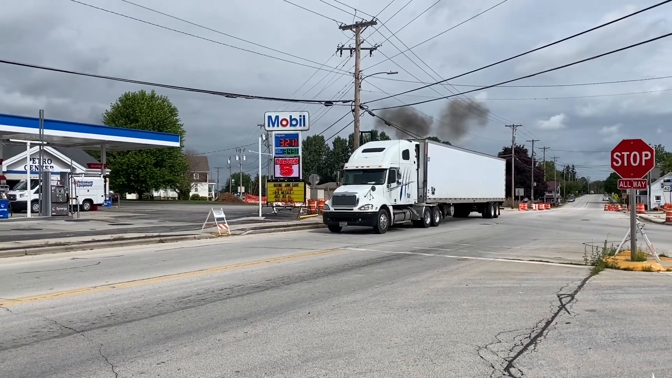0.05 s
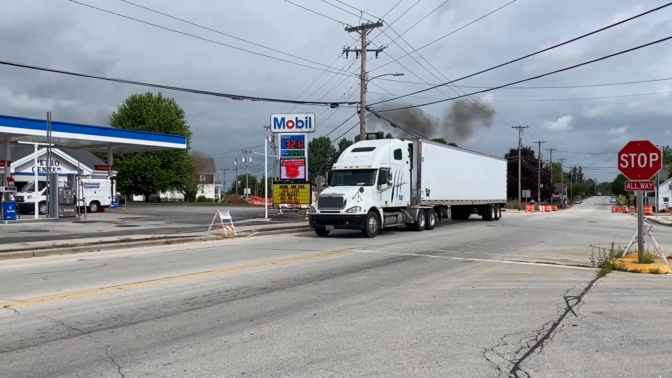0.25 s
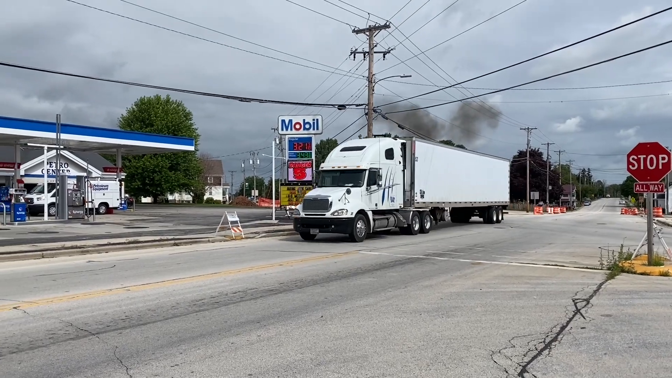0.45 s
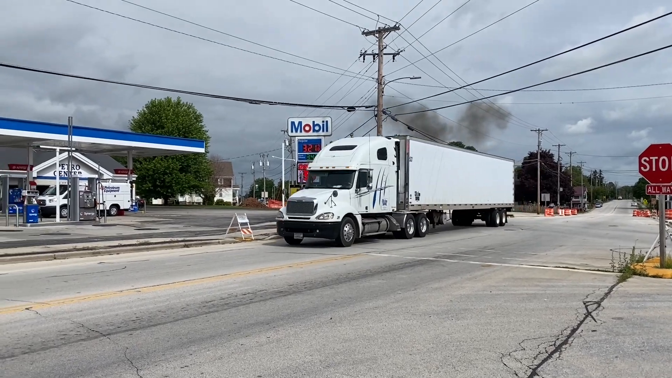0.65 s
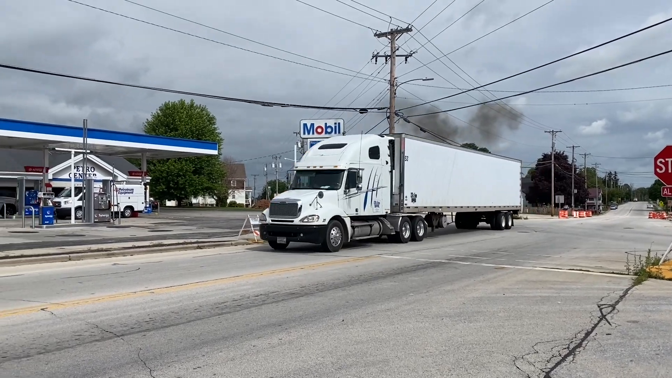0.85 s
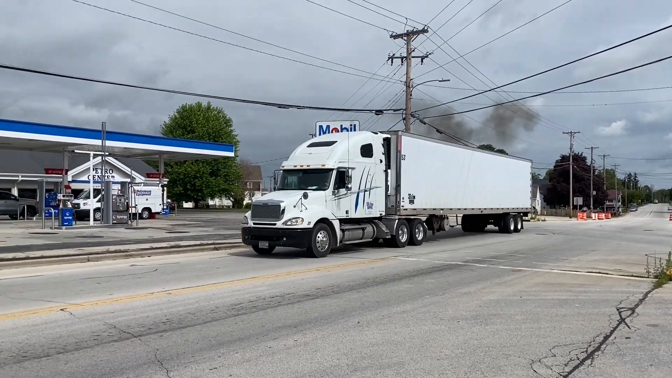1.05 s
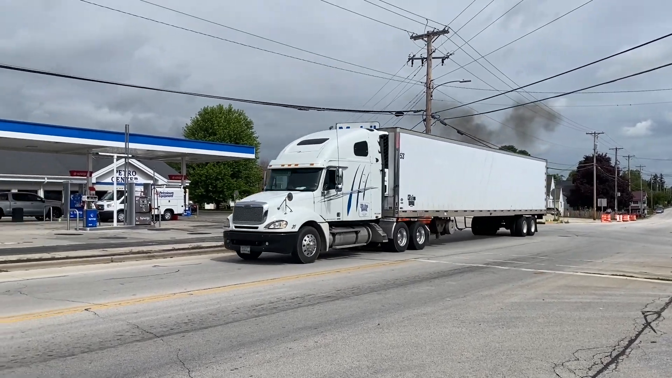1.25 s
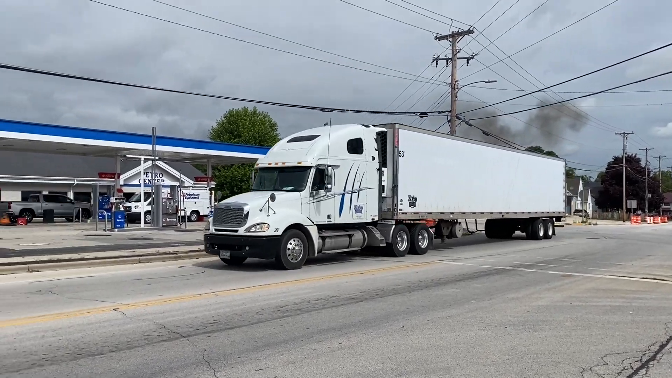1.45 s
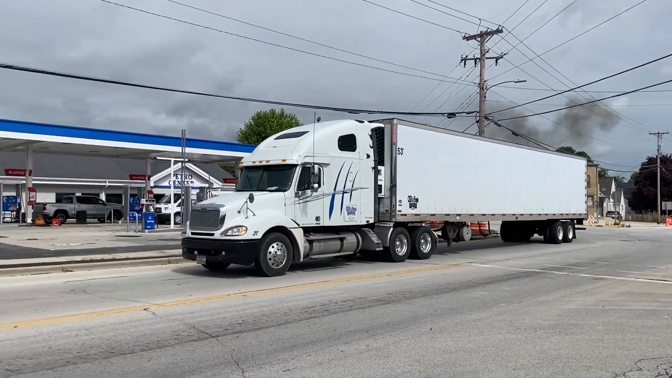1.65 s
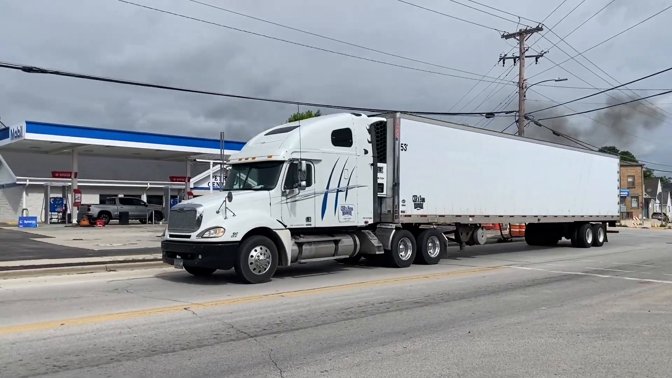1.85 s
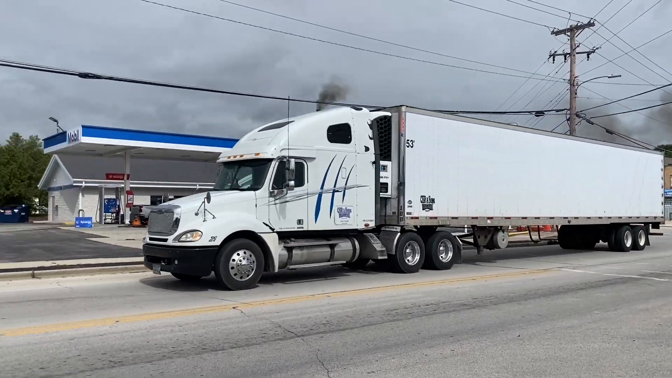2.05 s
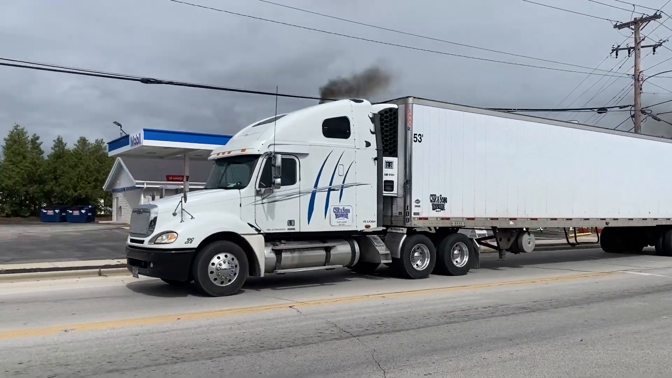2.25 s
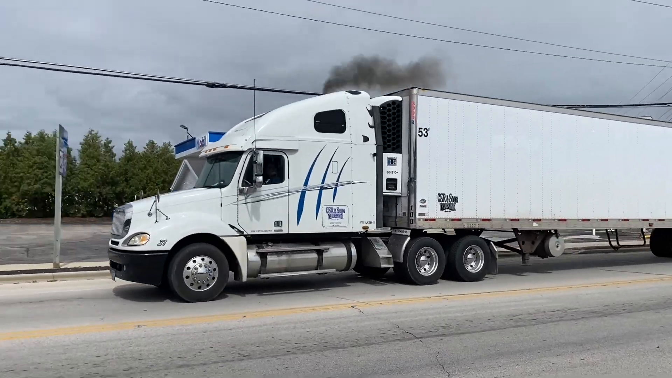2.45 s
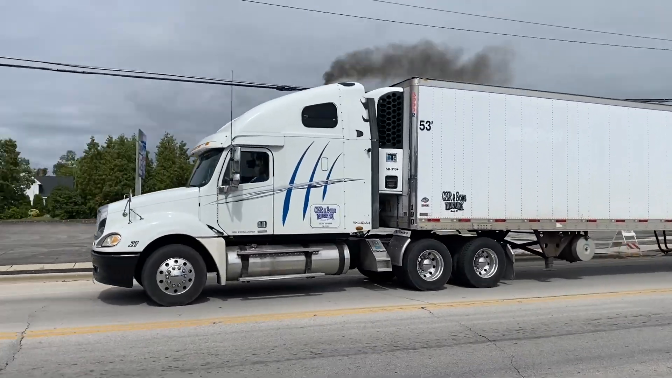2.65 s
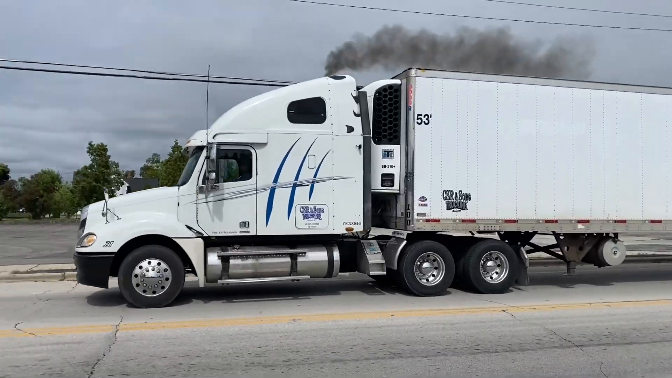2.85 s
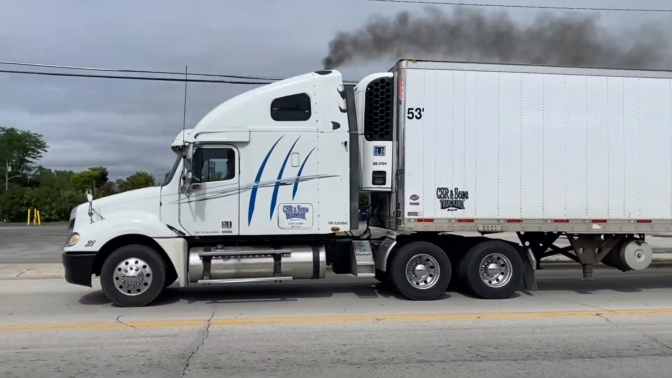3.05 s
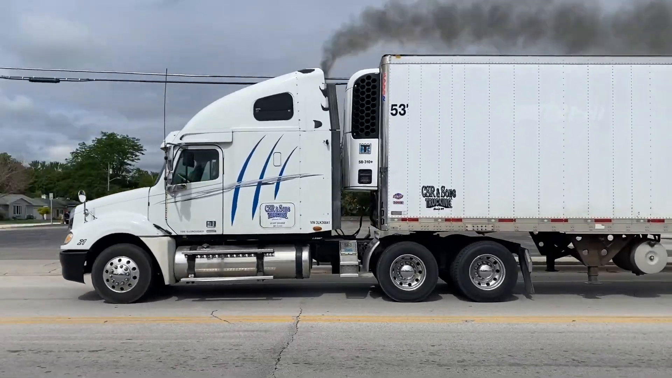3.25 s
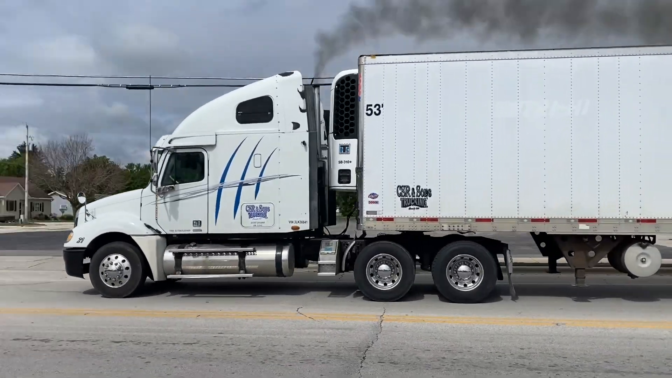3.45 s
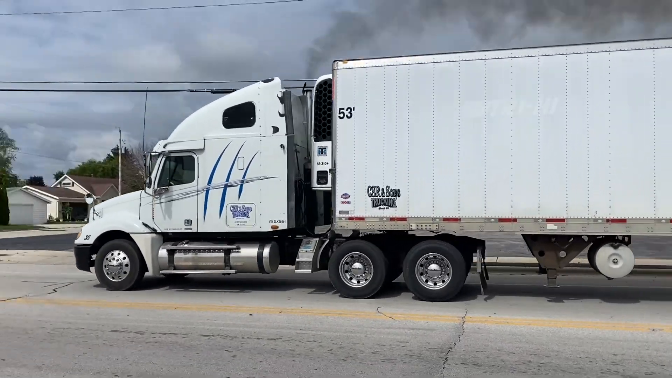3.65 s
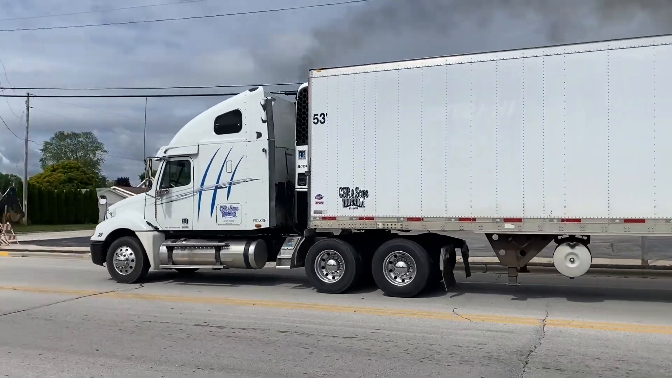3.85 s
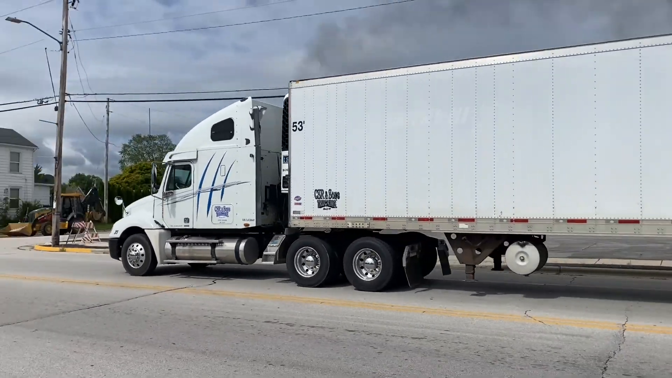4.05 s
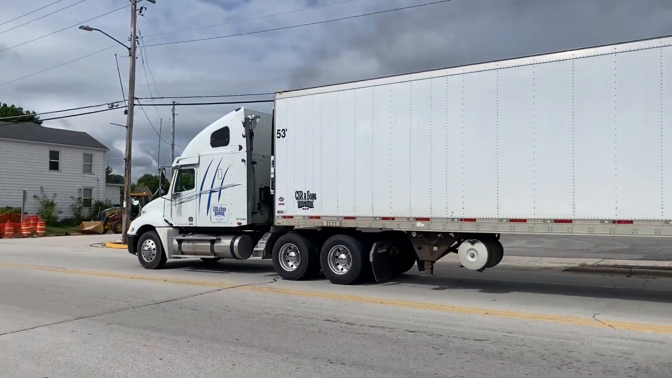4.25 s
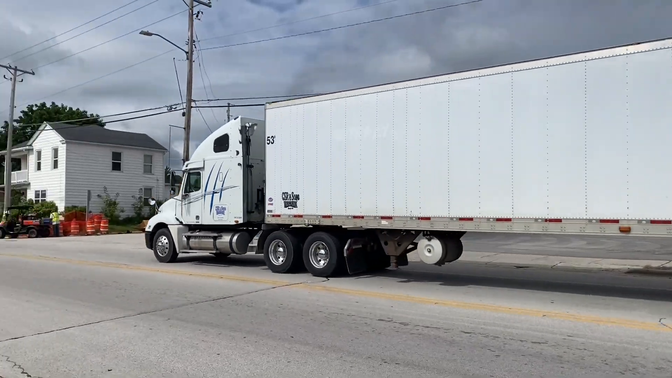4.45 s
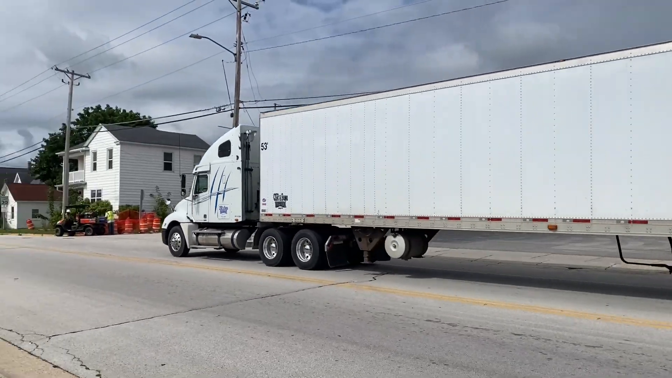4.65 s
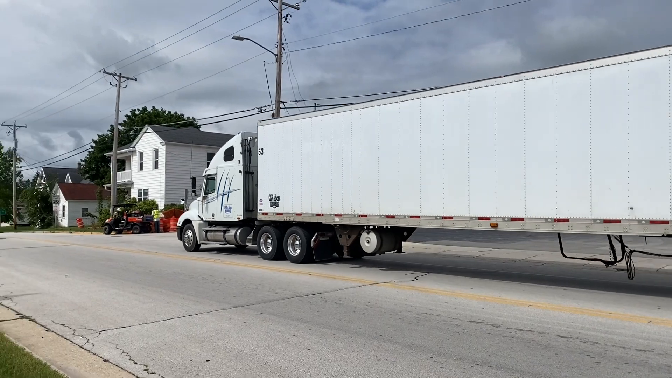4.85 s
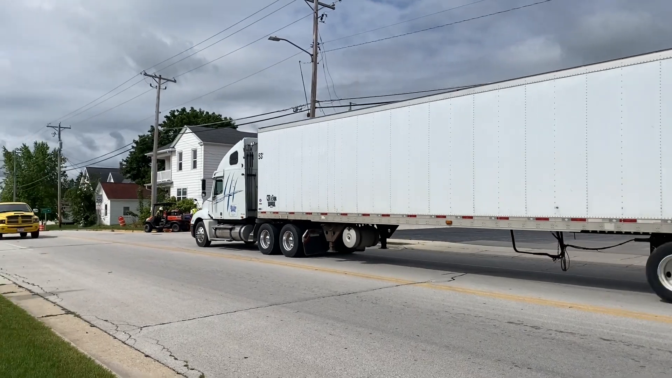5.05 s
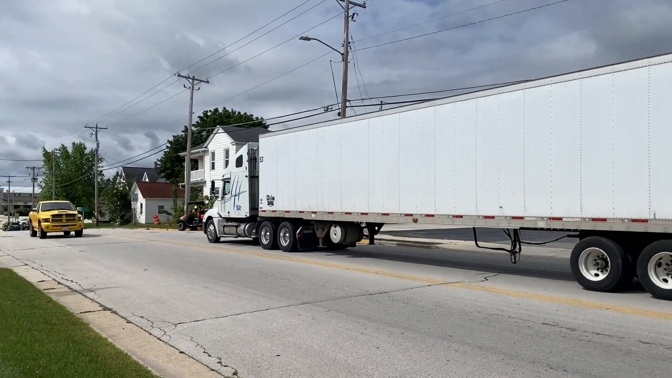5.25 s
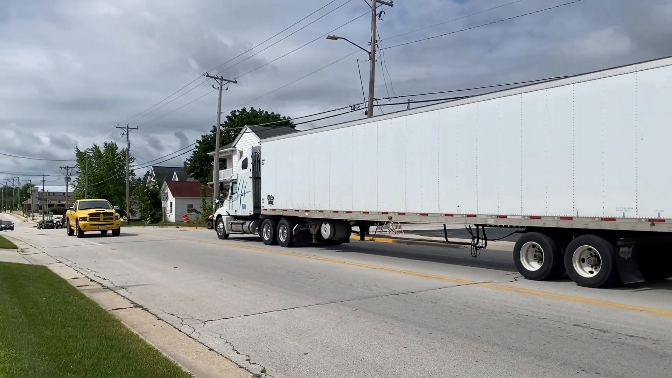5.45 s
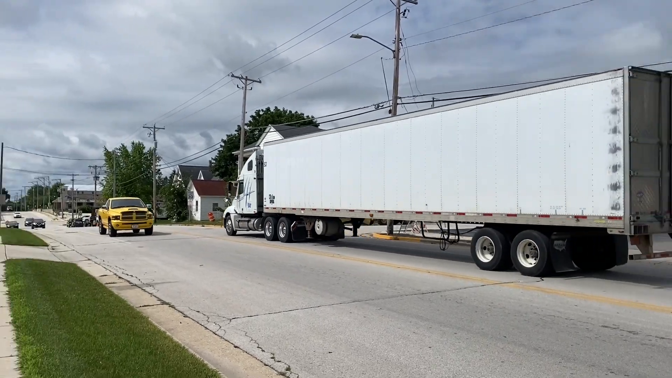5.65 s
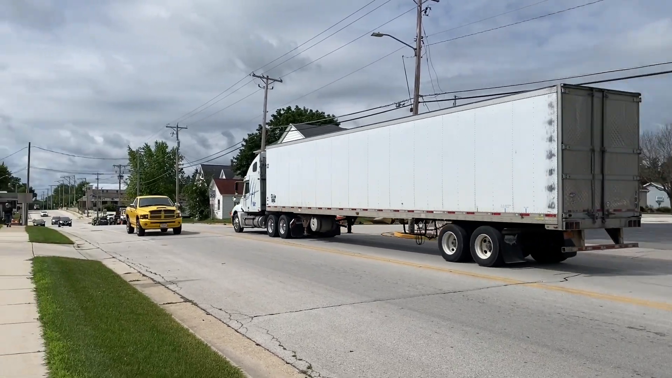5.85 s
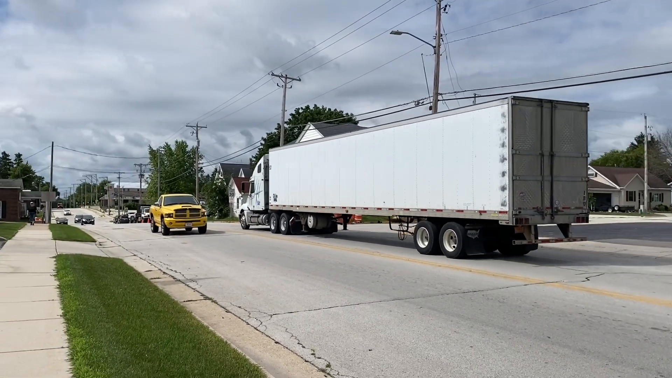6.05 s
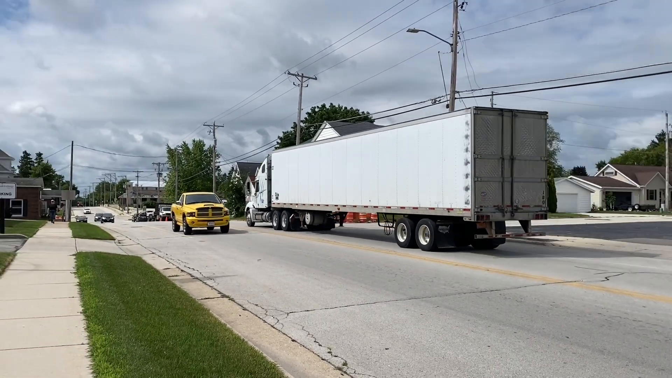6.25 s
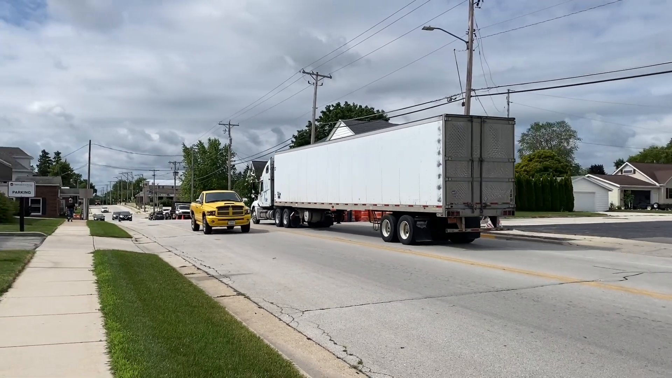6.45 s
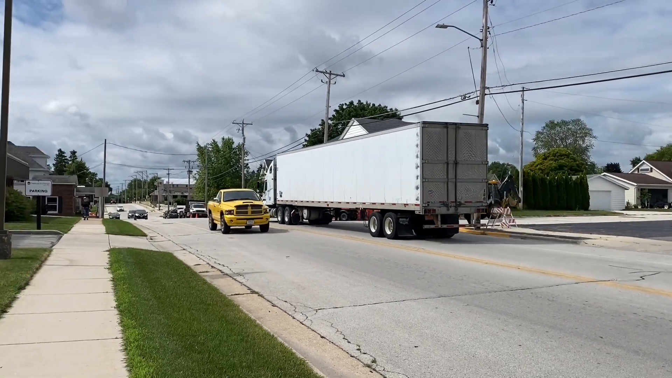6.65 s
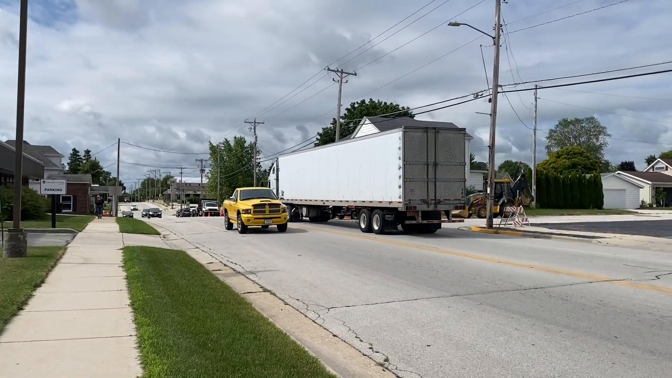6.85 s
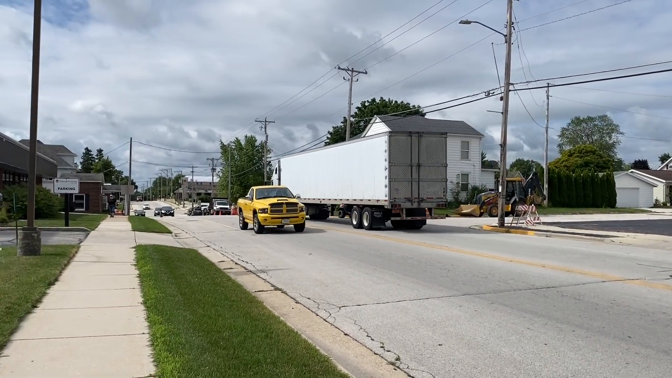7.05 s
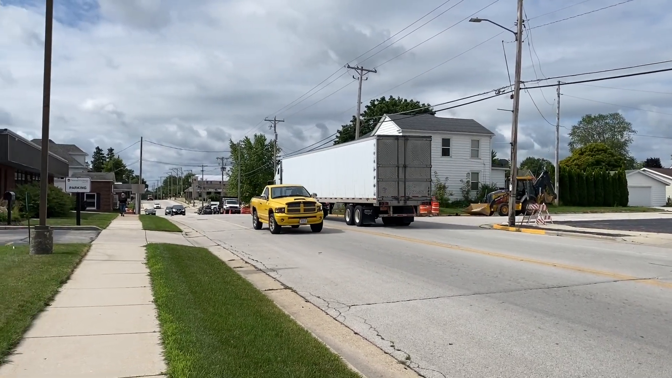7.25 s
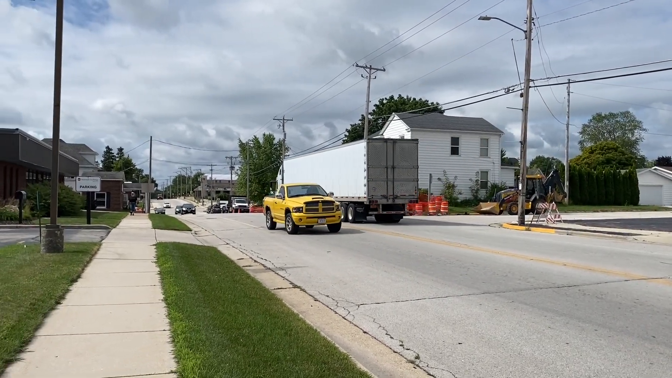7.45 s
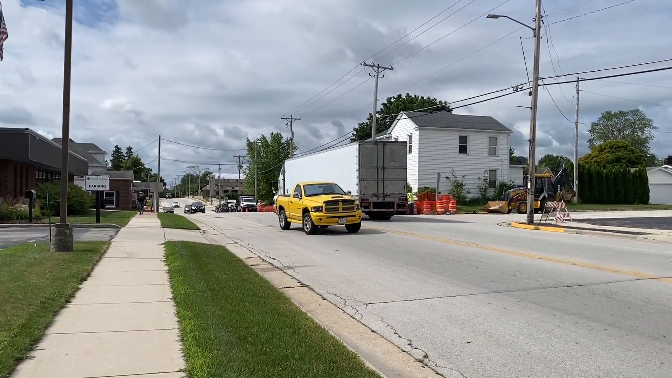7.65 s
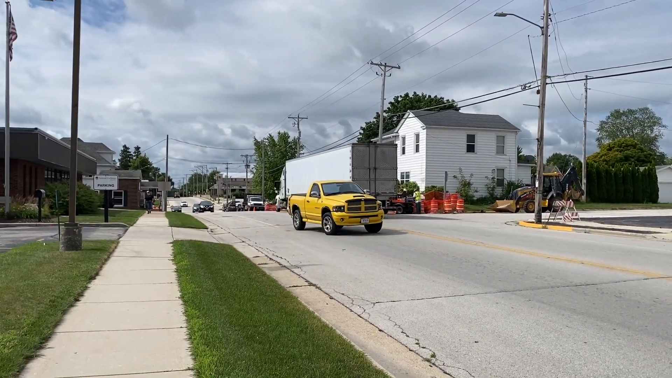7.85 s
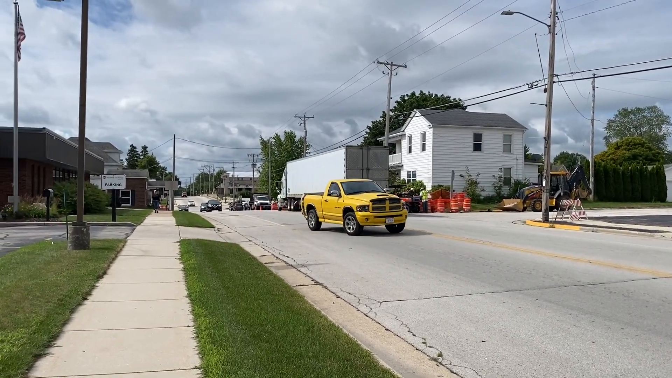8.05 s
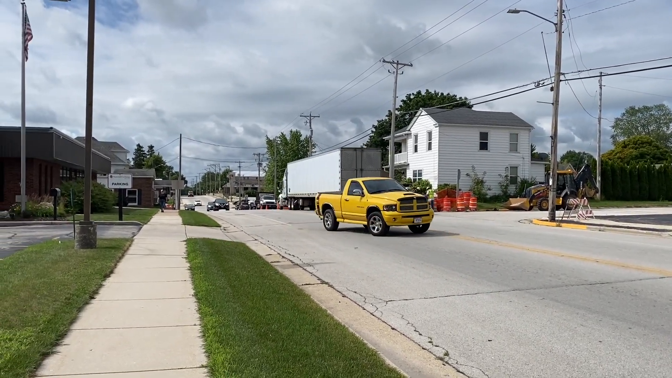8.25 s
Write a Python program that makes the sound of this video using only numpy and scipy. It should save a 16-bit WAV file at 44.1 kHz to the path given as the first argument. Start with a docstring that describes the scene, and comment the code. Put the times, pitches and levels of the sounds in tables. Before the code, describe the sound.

Outdoors on a town street, a big diesel truck approaches, its revs dropping for a gear change with a sharp puff of vented air. It pulls harder, exhaust booming and clattering past the close microphone, with turbo whine and one short high toot. It shifts again; the refrigerated trailer follows with a throbbing cooling engine, tyre roar, a rattling joint thump and small squeaks, then recedes.

```python
"""A diesel truck pulls up through a town junction and passes close by: exhaust boom, knock and hiss.
It changes gear with a puff of vented air, revs under a whistling turbo, gives one short high toot, shifts again.
Its refrigerated trailer follows: a cooling engine beats against the exhaust, tyres roar, road joints thump.
Engine tones are multiples of the firing rate, noises are coloured turbulence, whines are gliding tones.
Distance, bearing, throttle and revs set the levels at a two-port microphone 8.7 m from the cab's path."""
import sys
import numpy as np
from scipy import signal
from scipy.fft import rfft, irfft, next_fast_len
from scipy.io import wavfile

SR = 44100
rng = np.random.default_rng(int(sys.argv[2]) if len(sys.argv) > 2 else 0)


def generate_wav(sig):
    """Save sig (samples, or channels by samples) to the path in sys.argv[1] as 16-bit PCM at SR."""
    pcm = np.round(np.clip(np.atleast_2d(sig).T, -1, 1) * 32767).astype(np.int16)
    wavfile.write(sys.argv[1], SR, pcm)


N = 366471
TIME = np.arange(N) / SR

# revs of the six-cylinder truck engine: (time [s], firing rate [Hz])
ENGINE_REVS = [(0, 85.7), (.4, 90.7), (.6, 77.5), (.8, 76.6), (1.0, 70.5), (1.3, 65.7), (1.55, 69.9),
               (1.8, 66.4), (2.0, 68.7), (2.75, 73.3), (3.25, 77.6), (4.6, 86.7), (4.85, 85.9), (5.2, 81.7),
               (5.8, 71.4), (6.2, 68), (6.9, 64.8), (8.31, 68.6)]
# the driver's pulls in three gears: (throttle down [s], throttle up [s], share of full boost [0-1])
GEAR_PULLS = [(-6.5, .42, 1), (1.33, 4.91, 1), (6.0, 9, .03)]
# diesel clatter heard from the side of the rig: (frequency [Hz], density [dB per Hz])
SIDE_CLATTER = [(250, -82), (430, -12), (663, -5), (710, -2), (788, -4), (961, -3), (1050, -8), (1380, -9),
                (1660, -16), (1940, -18), (3090, -24.5), (3400, -22.5), (4420, -63), (7480, -120)]
# clatter and tyre roar heard from behind: (frequency [Hz], density [dB per Hz])
REAR_CLATTER = [(250, -37), (430, -5), (538, -5), (587, 0.5), (651, -1), (844, 0), (953, 0.5), (1090, -7.5),
                (1490, -5.5), (1670, -15.5), (1950, -12), (2190, -13.5), (2430, -17.5), (3400, -28.5),
                (4420, -36), (7480, -120)]
# low rumble heard from behind: (frequency [Hz], density [dB per Hz])
REAR_RUMBLE = [(42, -29), (60, 4.5), (100, 1), (130, 2.5), (160, 0.5), (205, 6), (250, -7), (340, -4.5),
               (440, -15), (750, -51)]
# level tilt between the microphone ports: (frequency [Hz], left minus right [dB])
PORT_TILT = [(60, -3), (250, -0.2), (500, -0.5), (1000, 3), (2000, -4.5), (4000, 4), (8000, 0)]
# the cab's straight path past the microphone, nearest at PASS_S
PASS_S, SPEED_M_PER_S, DISTANCE_M, SOUND_M_PER_S = 3.58, 8.4, 8.7, 343


def truck_exhaust(level_db, growl_db):
    """The stack booms under load; its overtones grow as it comes near."""
    # overtones that stand out in turn as the revs climb and the rig moves:
    # (multiple of the firing rate, level [dB], loudest at [s], rise [s], fall [s])
    stack_orders = [(3 / 6, -8, 0.1882, 1, .55), (3 / 6, -20.5, 3.7, 2, 1.8), (7, -12, 0.2, 2, 2),
                    (9, -14, 0.6, -0.5, -3), (11.5, -13, 0.6, 2, .5), (2, -7.5, 3, 2, 2),
                    (3, -8.5, 3.5, 1.1, 1), (4, -12, 2, 0.2, 0.694), (8 / 6, -11, 3.42, 0.76, .6),
                    (4, -10, 3.5, 0.65, 0.54), (17 / 6, -14, 3.3, 0.9, 1), (20 / 6, -9, 4, 1.27, 0.7),
                    (15 / 6, -15, 3.96, 1.2, 1.2), (9 / 6, -15.5, 4.3, 5.7, 2.5),
                    (35 / 6, -20, 4.5, 2, 2.3), (26 / 6, -15, 4.25, 0.86, 1.3), (4, -9, 4.5, 0.6, 0.5),
                    (14 / 6, -12.5, 4.46, 1.1, 1.4), (2, -8.5, 4.5, 0.65, 2.5),
                    (27 / 6, -11.5, 5.13, 0.86, 0.473)]
    load_db = effort_db(coast_db=13.5, octave_db=5.0, attack_s=0.6, release_s=0.45)
    boom_db = level_db + passing_db(spreading=0.88, shade_db=1.5) + load_db
    growl_db = growl_db + passing_db(spreading=0.4026, shade_db=2.2)
    firing_hz = in_time(ENGINE_REVS)[0]
    return exhaust(firing_hz, boom_db, stack_orders, rough=.27, waver=.08, growl_db=growl_db)


def exhaust(firing_hz, level_db, orders, rough, waver, growl_db=0):
    """Pipe tones on multiples of the firing rate; uneven combustion shakes the upper ones."""
    phase, overtones = turns(firing_hz), 0
    offsets = rng.uniform(0, 2 * np.pi, size=100)
    for multiple, order_db, peak_s, rise_s, fall_s in orders:
        sixths = round(multiple * 6)
        shake = (1 + rough * drift(4.7)) / np.sqrt(1 + rough ** 2)
        gain = from_db(order_db) * swell(peak_s, rise_s, fall_s) * shake
        timing = 1.4 * rough * drift(14)
        overtones += gain * np.cos(sixths / 6 * phase + offsets[sixths] + timing)
    fundamental = (1 + waver * drift(5.4)) * np.cos(phase)
    return np.sqrt(2) * from_db(level_db) * (fundamental + from_db(growl_db) * overtones)


def machinery(side_on_s, rear_on_s, away_s, turning_s):
    """Block rumble, diesel clatter and hiss; their colour changes as the rig shows front, side and rear."""
    # colours of rumble, clatter from the front, and intake hiss: (frequency [Hz], density [dB per Hz])
    block_rumble = [(42, -22), (60, 6), (100, 4.5), (130, 4.5), (180, 2.5), (230, 0), (290, 0.5), (380, -2),
                    (480, -17.5), (750, -30)]
    front_clatter = [(250, -40), (430, -10), (543, -6), (624, 2.5), (686, -2.5), (882, -1.5), (961, -4.5),
                     (1490, -6), (2010, -12.5), (2300, -12.5), (3040, -26), (3400, -29.5), (4420, -26.5),
                     (7480, -120)]
    intake_hiss = [(2000, 7), (3000, -4.5), (4200, 1), (6300, 0.5), (8000, -3.5), (10500, -8.5),
                   (12300, -8), (13500, -30), (16000, -32)]
    # where the engine sits as the microphone turns after it: (time [s], left minus right [dB])
    engine_pan = [(0, -1), (.35, -0.9768), (1.7, 1), (4.5, 0.2), (5.6, 0.3), (8.3, -0.9991)]
    rumble_db, clatter_db, hiss_db = rig_levels(rumble_db=-22, clatter_db=-24, hiss_db=-35,
                                                rumble_bite_db=0.5, clatter_bite_db=2.5)
    past_front, past_side, away = (np.clip((TIME - s) / turning_s + .5, 0, 1)
                                   for s in (side_on_s, rear_on_s, away_s))
    # front, side and rear views crossfade at equal power
    knock = firings(sharpness=.2, uneven_db=1.7)
    front = np.sqrt(1 - past_front) * air(front_clatter, knock, repeat=0.11)
    side = np.sqrt(past_front * (1 - past_side)) * air(SIDE_CLATTER, knock, repeat=0.33)
    soft_knock = firings(sharpness=0.049, uneven_db=0.75)
    rear = np.sqrt(past_side) * air(REAR_CLATTER, soft_knock, repeat=0.14)
    clatter = front + side + rear + np.sqrt(1 - away) * block_tones()
    block = air(block_rumble, firings(sharpness=.3, uneven_db=1.5), repeat=.25)
    rumble = np.sqrt(1 - away) * from_db(-1) * block + np.sqrt(away) * from_db(1) * air(REAR_RUMBLE)
    hiss = air(intake_hiss, firings(sharpness=0.022, uneven_db=0.83), repeat=0.12)
    upper = from_db(clatter_db) * clatter + from_db(hiss_db) * hiss
    return from_db(rumble_db) * rumble + panned(upper, in_time(engine_pan)[0])


def rig_levels(rumble_db, clatter_db, hiss_db, rumble_bite_db, clatter_bite_db):
    """Rumble, clatter and intake hiss each follow distance, throttle and revs."""
    rumble = (rumble_db + passing_db(spreading=0.66, shade_db=2.5) + rumble_bite_db * bite()
              + effort_db(coast_db=2.0, octave_db=6.0, attack_s=0.3, release_s=0.49))
    clatter = (clatter_db + passing_db(spreading=0.86, shade_db=4.5) + clatter_bite_db * bite()
               + effort_db(coast_db=1.0, octave_db=21.5, attack_s=0.16, release_s=0.34))
    hiss = (hiss_db + passing_db(spreading=1.3621, shade_db=4.5)
            + effort_db(coast_db=2.0, octave_db=15.0, attack_s=0.27, release_s=0.1))
    return rumble, clatter, hiss


def bite():
    """A diesel knocks harder just after the throttle opens, until the turbo catches up."""
    return sum(swell(down + .36, rise_s=.34, fall_s=.6) for down, _, _ in GEAR_PULLS)


def firings(sharpness, uneven_db):
    """A burst of pressure at each firing, no two equally strong."""
    phase = turns(in_time(ENGINE_REVS)[0])
    stroke = (phase / (2 * np.pi)).astype(int)
    strength = from_db(uneven_db * rng.standard_normal(1024))
    return rms_one(np.exp(-sharpness * np.cos(phase)) * strength[stroke])


def engine_cycle(size=3500):
    """Valves, injectors and gears make the same rattle again after every six firings."""
    cycles = turns(in_time(ENGINE_REVS)[0]) / (2 * np.pi * 6)
    return rng.standard_normal(size)[(cycles * size).astype(int) % size]


def block_tones(count=26):
    """Block and gears ring on scattered multiples of the crank rate, a third of the firing rate."""
    firing_hz = in_time(ENGINE_REVS)[0]
    crank, out = turns(firing_hz / 3), 0
    for multiple in np.round(np.geomspace(17, 90, count) + rng.uniform(-.5, .5, count)):
        colour_db = at_hz(SIDE_CLATTER, multiple * firing_hz.mean() / 3)
        fade_db = 5.5 * np.tanh(drift(1.6))  # tones come and go as their reflections shift
        out = out + from_db(colour_db + fade_db) * np.cos(multiple * crank + rng.uniform(0, 2 * np.pi))
    return from_db(-8) * at_ports(rms_one(out), pan_db=3.0, lag_s=0.00013)


def turbo(rush_db):
    """The compressor whistles as it spools up, flares as the throttle shuts, and boost air rushes."""
    # air rushing through under boost: (frequency [Hz], density [dB per Hz])
    boost_rush = [(7000, -53), (9000, -5.5), (11000, 1), (12300, -2.5), (13500, -22.5), (16000, -41)]
    idle_hz, full_hz = 6989, 13000
    spool_lag_s, spool_s, coast_s = 1.36, .33, .49
    spool_db, flare_db, flare_rise_s, flare_fade_db_per_s = -44.5, -35.5, 0.14, 46
    speed, gain = 0, 0
    for down, up, boost in GEAR_PULLS:
        spun = ease((TIME - down - spool_lag_s) / spool_s)
        coasting = np.maximum(TIME - up, 0)
        speed = np.maximum(speed, boost * spun * np.exp(-coasting / coast_s))
        gaining = 4 * spun * (1 - spun)  # one while the speed climbs fastest
        flare_shape = np.minimum(coasting / flare_rise_s, 1) ** 2
        flare = flare_shape * from_db(flare_db - flare_fade_db_per_s * coasting)
        gain = gain + boost * (from_db(spool_db) * gaining + flare)
    load_db = effort_db(coast_db=7.5, octave_db=15, attack_s=2.151, release_s=0.7)
    rush_db = rush_db + passing_db(spreading=2.35, shade_db=8.0) + load_db
    hz = idle_hz + (full_hz - idle_hz) * speed
    gain = gain * np.clip(speed / .35, .1, 1)  # a slow wheel whistles faintly
    tone = whistle(hz, gain, width_hz=470, breathy=0.87, spread=0.95)
    return from_db(rush_db) * air(boost_rush) + tone


def driveline(thin_db):
    """Whines that come and go with the load and flutter in the moving air."""
    # a thin whine that sinks as the throttle shuts: (time [s], pitch [Hz])
    thin_pitch = [(3.6, 9350), (3.8, 9830), (4.1, 10020), (4.5, 9930), (4.7, 9690), (4.85, 9300),
                  (5.02, 8600)]
    # breathy whines and rasps that swell and fade as the rig goes by:
    # (peak [s], pitch [Hz], glide [Hz per s], level [dB], rise [s], fall [s], width [Hz])
    breathy_whines = [(.2, 2535, 2, -34.5, 1.3, 0.46, 840), (.3, 5092, -31.5, -49.5, .9, .25, 97),
                      (.78, 6830, -3400, -49, 0.73, 0.68, 460), (2.1, 900, -29, -27, 0.85, 0.47, 116),
                      (2.5, 6381, 121, -55, 2.685, 1.3, 240), (2.6, 4030, 100, -39.5, 1.6415, 1.7, 640),
                      (2.73, 325.3, -10, -28, 0.51, 0.44, 6), (2.98, 996, -39.5, -30, 0.66, .45, 17),
                      (3.33, 5220, -29.5, -38, 0.38, 0.48, 80), (3.5, 3060, 1099.5, -40.5, 0.34, .45, 180),
                      (3.55, 2654, 249.5, -39, 0.48, 0.63, 170), (3.56, 870, 20, -32.5, 0.77, 0.23, 23),
                      (3.8, 5020, -550, -34.5, 0.64, 0.4, 160), (3.92, 711, 0, -31, .4, 0.41, 6),
                      (4.09, 4880, -200, -40, 0.26, 0.24, 130), (4.2, 5624, -150, -43, 0.2, 0.3, 200),
                      (4.33, 5180, 700, -46, .2, .2, 140), (4.52, 5400, -450, -43, 0.4834, 0.38, 220),
                      (4.66, 840, 55, -30, 0.55, 0.37, 7), (4.7, 863, 40.5, -39, .35, .35, 7),
                      (4.7, 901.5, 70, -32.5, .6, 0.71, 74), (6.4, 956, 0, -38, 0.73, 0.69, 90),
                      (4.75, 5130, -900, -48.5, .25, 0.252, 150), (4.78, 4600, -700, -50.5, .31, 0.25, 140),
                      (4.9, 2130, 0, -42.5, 1.2, 1.1, 200), (5.55, 6000, 0, -55.5, 0.263, 0.54, 240),
                      (6.6, 6179, 153, -65, 1, 2, 240), (7.0, 3060, -0.5, -50, 0.243, 0.23, 983),
                      (8.0, 3420, 0.5, -57.5, 1.8, 1.5, 1100)]
    thin_gain = from_db(thin_db) * held(3.3, 4.87, attack_s=0.23, release_s=0.24)
    thin = whistle(in_time(thin_pitch)[0], thin_gain, width_hz=73, breathy=0.79, spread=1.0)
    flutter = from_db(1.5 * drift(22) - .2)
    whines = 0
    for peak_s, hz, glide, level_db, rise_s, fall_s, width_hz in breathy_whines:
        pitch_hz = hz + glide * (TIME - peak_s)
        gain = from_db(level_db) * swell(peak_s, rise_s, fall_s)
        whine = whistle(pitch_hz, gain, width_hz, breathy=0.8913, spread=0.52)
        whines = whines + panned(whine, at_hz(PORT_TILT, hz))
    return thin + flutter * whines


def air_puff(level_db):
    """Air vented at the gear change: the valve opens quickly, sputters and empties more slowly."""
    # colour of the vented air: (frequency [Hz], density [dB per Hz])
    vented_air = [(1200, -1.5), (2200, -3), (3000, -14.5), (4000, -4.5), (4700, -2), (5200, -5.5),
                  (6300, 2.5), (7000, -5), (9000, -6), (11000, -1), (12700, -8), (13800, -21), (15600, -10)]
    sputter = from_db(.8 * drift(40))
    return from_db(level_db) * swell(peak_s=1.502, rise_s=0.12, fall_s=0.2) * sputter * air(vented_air)


def toot(top_db):
    """One short high horn note that bends up a little and leaves a faint tail."""
    # course of the note: (time [s], pitch [Hz], level below its top [dB])
    note = [(3.13, 1196, -12), (3.195, 1182, 0), (3.31, 1178, -3), (3.45, 1208, 0), (3.615, 1230, -2),
            (3.635, 1226, -11), (3.76, 1246, -7), (3.9, 1268, -11)]
    hz, shape_db = in_time(note)
    gain = from_db(top_db + shape_db) * held(note[0][0], note[-1][0], attack_s=0.02, release_s=0.06)
    return whistle(hz, gain, width_hz=16, breathy=0.06, spread=0.55)


def squeal(pitch_hz):
    """Rubbing steel that grips and lets go in short runs, sinking in pitch as it passes."""
    # runs of grip: (start [s], length [s], level [dB])
    grips = [(3.933, .05, -40), (4.05, .08, -41), (4.22, .08, -46), (4.422, .16, -43), (4.6, .26, -48)]
    gain = sum(from_db(level_db) * held(s, s + length, attack_s=0.015, release_s=0.03)
               for s, length, level_db in grips)
    return whistle(pitch_hz * doppler(), gain, width_hz=19, breathy=0.21, spread=0.521)


def thumps(rise_s, clank_db):
    """Each road joint gives the trailer a dull thud, slaps its panels and rattles its loose steel."""
    # wheels and chassis over the joints:
    # (time [s], thud [dB], rattle [dB], slap [dB], decay by 60 dB [s])
    joints = [(.906, -22, -46, -60, 0.097), (1.945, -26, -42, -54, .08), (2.34, -24, -37, -50, 0.078),
              (2.974, -22, -36, -50, 0.077), (5.648, -21, -26, -32, 0.095), (5.657, -21, -22.5, -28, 0.11),
              (5.672, -17, -21.5, -29, 0.071), (5.692, -23, -24, -36, .07), (5.708, -21, -23.5, -39, 0.076),
              (5.722, -22.5, -29, -39, .22), (6.434, -29, -28, -48, .07), (6.459, -34, -26, -41, 0.11),
              (6.479, -22, -27, -39, 0.098), (6.502, -27, -33, -46, .2), (7.384, -19.5, -50, -62, .1),
              (7.469, -26, -27.5, -47, .06), (7.475, -26, -29, -49, .09)]
    # colours of thud, rattle and slap: (frequency [Hz], density [dB per Hz])
    thud_body = [(70, -12), (130, 9), (280, 8), (430, -1), (700, -17), (1300, -34)]
    loose_steel = [(400, 2), (720, 13), (900, 11), (1400, 3.5), (1800, -4), (3000, -22)]
    panel_slap = [(1400, -6), (2000, 2.5), (2450, 3), (2900, -9), (3600, -14.5), (6000, -22), (12000, -38)]
    thud, rattle, slap = 0, 0, 0
    for s, thud_db, rattle_db, slap_db, t60 in joints:
        age = np.maximum(TIME - s, 0)
        shake = 1e-3 ** np.minimum(age / t60, 2) * (1 - np.exp(-age / rise_s))
        thud = thud + from_db(thud_db) * shake
        rattle = rattle + from_db(rattle_db) * shake
        slap = slap + from_db(slap_db) * shake
    clanks = rms_one(from_db(clank_db * drift(200)))
    return thud * air(thud_body) + rattle * air(loose_steel, clanks) + slap * air(panel_slap, clanks)


def squeaks(rise_s, rough):
    """Brief scratchy chirps: steady tones that jump up and die away, roughened by fast chance."""
    # short high chirps: (time [s], pitch [Hz], level [dB])
    chirps = [(6.135, 4610, -42), (6.27, 7100, -50), (6.65, 4453, -48.5), (6.69, 4620, -43),
              (7.245, 10700, -51.5), (7.36, 4560, -51), (7.563, 4530, -44), (7.732, 4580, -50)]
    out, t = np.zeros(N), np.arange(SR // 8) / SR
    for s, hz, level_db in chirps:
        start = int(s * SR)
        shape = t / rise_s * np.exp(1 - t / rise_s)
        out[start:start + len(t)] += from_db(level_db) * shape * np.sin(2 * np.pi * hz * t)
    return out * (1 + rough * drift(220)) / np.sqrt(1 + rough ** 2)


def trailer_tyres(roar_db, rumble_db):
    """The rear tyres throw their roar and rumble backwards, so both swell after they have passed."""
    roll = from_db(roar_db) * air(REAR_CLATTER) + from_db(rumble_db) * air(REAR_RUMBLE)
    return swell(peak_s=6.17, rise_s=1.0, fall_s=2.05) * roll


def cooling_unit(level_db, dip_db, firing_hz):
    """A small constant-speed diesel on the trailer's front wall; its hum dips briefly once past."""
    # overtones of the cooling engine:
    # (multiple of the firing rate, level [dB], loudest at [s], rise [s], fall [s])
    cooling_orders = [(3, -10, 0.74, 4.8, 3.3), (2, -15, 4, 12, 13.36), (3, -10.5, 6.2, 1.7, 5)]
    dip = dip_db * swell(peak_s=5.27, rise_s=0.564, fall_s=0.32)
    hum_db = level_db + passing_db(spreading=0.18, shade_db=4.5) - dip
    return exhaust(firing_hz * doppler(), hum_db, cooling_orders, rough=.35, waver=.03)


def air(spectrum, drive=1, repeat=0):
    """Turbulence gated by `drive` and coloured, at two ports; `repeat` of it recurs each engine cycle."""
    # difference between the ports: (frequency [Hz], side minus mid [dB])
    port_width = [(60, -26), (125, -22.5), (250, -19), (500, -10), (1000, -10), (2000, -2), (4000, 4.5),
                  (10000, -3.5), (14000, 5.5)]
    # part of the side that is only a phase lead: (frequency [Hz], share [0-1])
    lead_share = [(60, .7), (250, 0.37), (500, 0.3285), (1000, 0.6505), (2000, 0.68), (4000, .35),
                  (10000, .8)]
    size = next_fast_len(N, real=True)
    hz = np.geomspace(1, SR / 2, 1500)
    bins = np.arange(size // 2 + 1) * SR / size
    # beyond either end of the table the sound falls away steeply
    outside = np.minimum(hz / spectrum[0][0], 1) * np.minimum(spectrum[-1][0] / hz, 1)
    colour = from_db(at_hz(spectrum, hz)) * outside ** 4
    noise, repeat = rng.standard_normal((2, N)), np.clip(repeat, 0, 1)
    if repeat:
        noise[0] = np.sqrt(1 - repeat) * noise[0] + np.sqrt(repeat) * engine_cycle()
    driven = (noise * drive).astype(np.float32)
    direct, scattered = rfft(driven, size) * np.interp(bins, hz, colour)
    # the ports differ by a phase lead, a level tilt and scattered sound
    share = np.clip(at_hz(lead_share, hz), 0, 1)
    width = from_db(at_hz(port_width, hz))
    lead = 1j * width * np.sqrt(share) + from_db(at_hz(PORT_TILT, hz) / 2) - 1
    scatter = width * np.sqrt(1 - share)
    side = direct * np.interp(bins, hz, lead) + scattered * np.interp(bins, hz, scatter)
    mid, side = irfft(np.array([direct, side], np.complex64), size)[:, :N].astype(float)
    return np.array([mid + side, mid - side]) / np.std(mid)


def whistle(hz, gain, width_hz, breathy, spread):
    """A gliding tone, `breathy` of it narrow-band noise; reflections differ between the ports."""
    breathy = np.clip(breathy, 0, 1)
    breath = drift(width_hz) + 1j * drift(width_hz)
    flutter = np.sqrt(1 - breathy) + np.sqrt(breathy / 2) * breath
    tone = np.sqrt(2) * gain * flutter * np.exp(1j * turns(hz))
    side = spread * tone.imag * (1 + 0.38 * drift(9.1))
    return np.array([tone.real - side, tone.real + side])


def path():
    """The cab's spreading loss in dB, and its bearing from -1 (coming) to 1 (going)."""
    along = SPEED_M_PER_S * (TIME - PASS_S)
    distance = np.hypot(along, DISTANCE_M)
    return 20 * np.log10(DISTANCE_M / distance), along / distance


def doppler():
    """Pitch factor of anything that travels with the rig."""
    return 1 / (1 + path()[1] * SPEED_M_PER_S / SOUND_M_PER_S)


def passing_db(spreading, shade_db):
    """A part of the rig takes a share of the spreading loss and is shaded by the trailer once past."""
    loss_db, bearing = path()
    return spreading * loss_db - shade_db * bearing


def effort_db(coast_db, octave_db, attack_s, release_s):
    """An engine sound drops by `coast_db` off the throttle and grows by `octave_db` as revs double."""
    load = sum(held(down, up, attack_s, release_s) for down, up, _ in GEAR_PULLS)
    revs = np.log2(in_time(ENGINE_REVS)[0])
    return coast_db * (load - 1) + octave_db * (revs - revs.mean())


def at_ports(x, pan_db, lag_s):
    """A sound reaches the right port a moment after the left."""
    left = np.interp(TIME + lag_s / 2, TIME, x)
    right = np.interp(TIME - lag_s / 2, TIME, x)
    return panned([left, right], pan_db)


def panned(x, pan_db):
    """Tip a sound towards the left port."""
    return np.array([x[0] * from_db(pan_db / 2), x[1] * from_db(-pan_db / 2)])


def held(start_s, end_s, attack_s, release_s):
    """Attack, hold and release, from zero to one."""
    attack = np.clip((TIME - start_s) / attack_s, 0, 1)
    return attack * np.clip(1 - (TIME - end_s) / release_s, 0, 1)


def swell(peak_s, rise_s, fall_s):
    """A rounded gain, 20 dB down at `rise_s` before its peak and `fall_s` after it."""
    away = (TIME - peak_s) / np.where(TIME < peak_s, rise_s, fall_s)
    return from_db(-20 * np.minimum(away ** 2, 10))


def ease(s):
    """A smooth step from zero to one around s = 0."""
    return .5 + .5 * np.tanh(s / 2)


def drift(rate):
    """Smooth chance with spread one, changing about `rate` times a second."""
    r = np.exp(-20 * np.pi * rate / SR)  # runs at a tenth of the sample rate
    chance = rng.standard_normal(N // 10 + 4002)
    slow = signal.lfilter([1], [1, -2 * r, r * r], chance)[4000:]
    return np.interp(np.arange(N) / 10, np.arange(len(slow)), rms_one(slow))


def turns(hz):
    """Running phase of a changing frequency, in radians."""
    return 2 * np.pi * np.cumsum(hz) / SR


def in_time(rows):
    """Each column of a curve at every sample."""
    s, *columns = np.transpose(rows)
    return [np.interp(TIME, s, c) for c in columns]


def at_hz(points, hz):
    """Read a table on a log-frequency axis."""
    table = np.array(points)
    return np.interp(np.log(hz), np.log(table[:, 0]), table[:, 1])


def from_db(db):
    """Decibels to gain."""
    return 10 ** (np.asarray(db) / 20)


def rms_one(x):
    """Scale to unit power."""
    return x / np.sqrt(np.mean(x ** 2) + 1e-20)


def scene():
    """The two engines throb against each other under the noise of the rig."""
    stack = truck_exhaust(level_db=-19.0, growl_db=2.5)
    cooling = cooling_unit(level_db=-23.0, dip_db=7, firing_hz=59.27)
    drone = at_ports(stack - cooling, pan_db=-0.8, lag_s=0.00014)
    rig = machinery(side_on_s=2.38, rear_on_s=4.09, away_s=4.68, turning_s=0.97)
    tyres = trailer_tyres(roar_db=-33.5, rumble_db=-33.0)
    whines = turbo(rush_db=-40.0) + driveline(thin_db=-52.5) + squeal(pitch_hz=6745)
    signals = toot(top_db=-23) + air_puff(level_db=-19.0)
    knocks = thumps(rise_s=0.003, clank_db=1.4) + squeaks(rise_s=0.0031, rough=0.83)
    return drone + rig + tyres + whines + signals + knocks


def port_notch(x, hz, q):
    """The microphone ports swallow one narrow treble band."""
    return signal.lfilter(*signal.iirnotch(hz, q, fs=SR), x)


def record(dry):
    """Microphone colour and a steep top cut, 70 dB down from 16.5 kHz."""
    top_cut = signal.cheby2(14, 70, 16500, fs=SR, output="sos")
    return signal.sosfilt(top_cut, port_notch(dry, hz=8250, q=5.5))


dry = scene()
out = record(dry)
generate_wav(out)
```